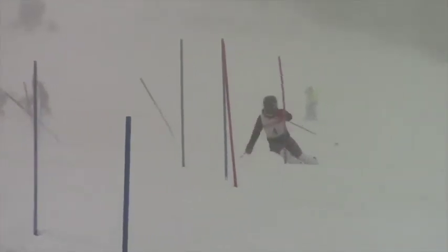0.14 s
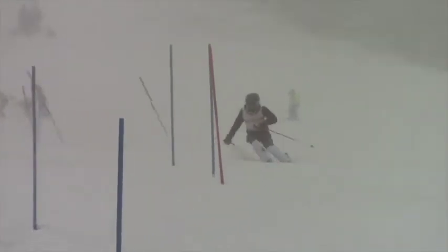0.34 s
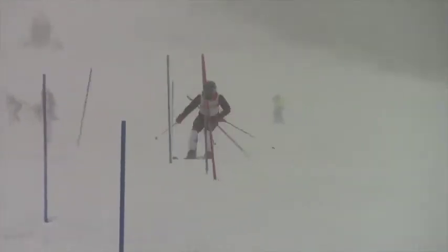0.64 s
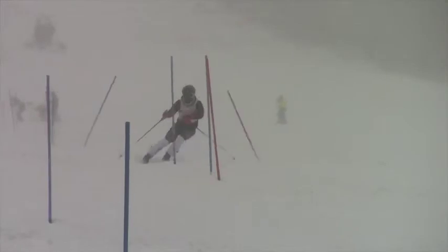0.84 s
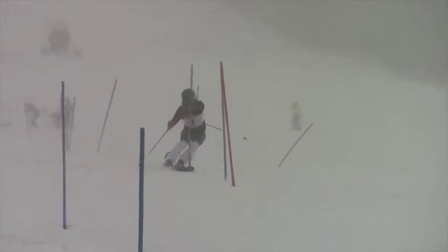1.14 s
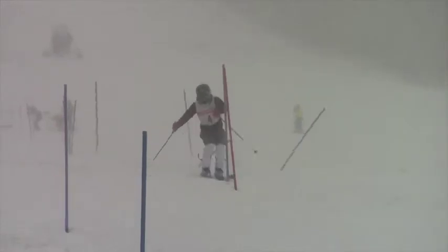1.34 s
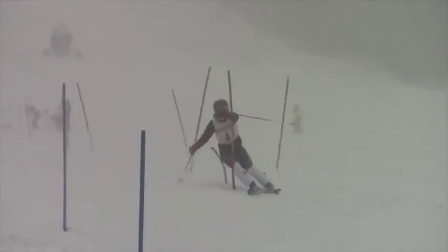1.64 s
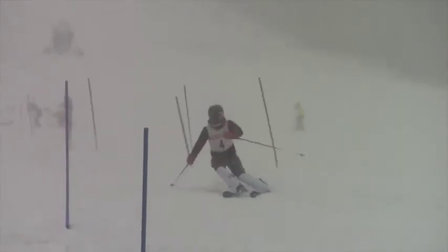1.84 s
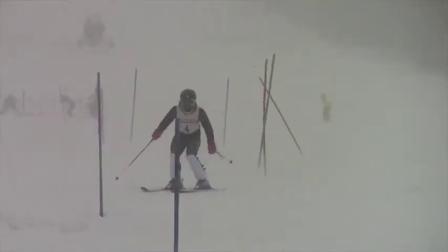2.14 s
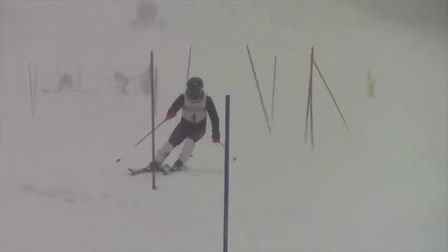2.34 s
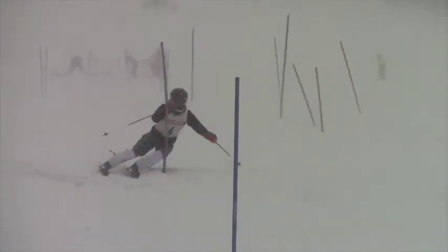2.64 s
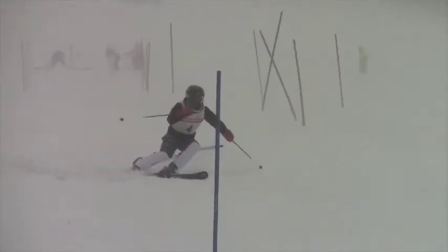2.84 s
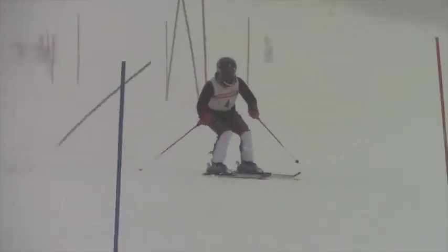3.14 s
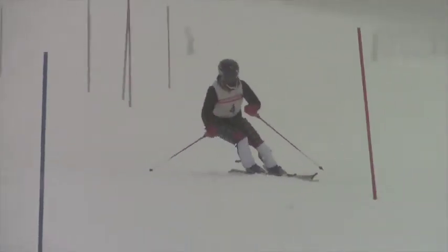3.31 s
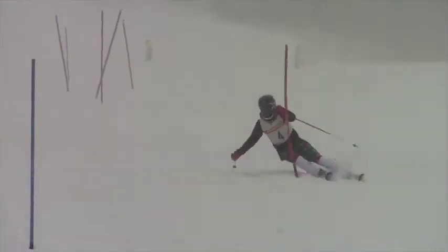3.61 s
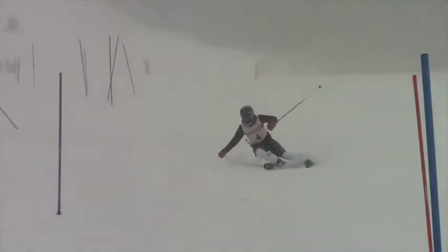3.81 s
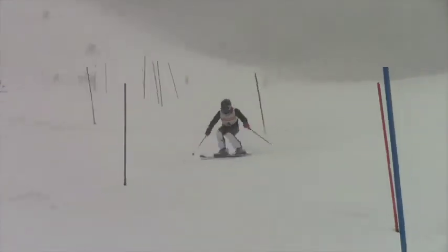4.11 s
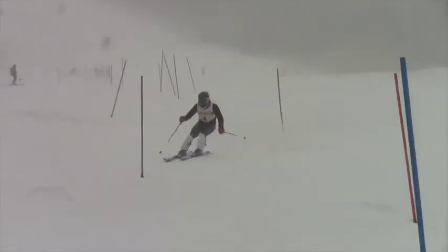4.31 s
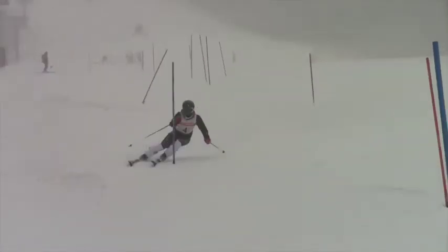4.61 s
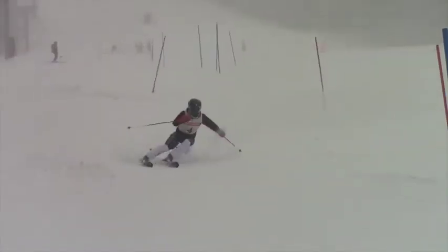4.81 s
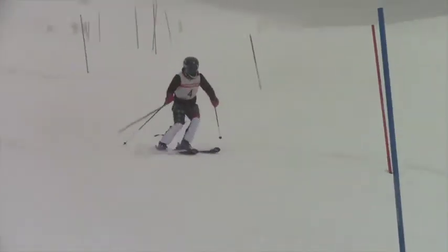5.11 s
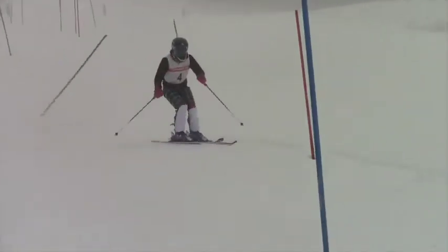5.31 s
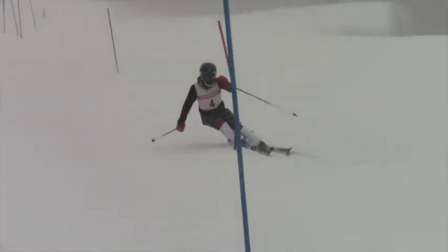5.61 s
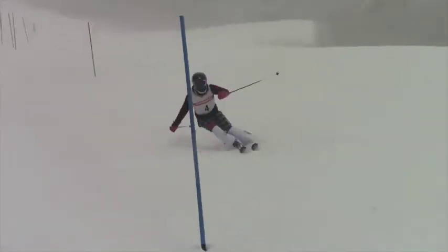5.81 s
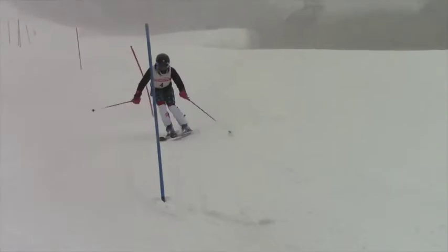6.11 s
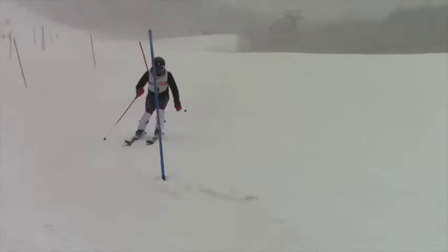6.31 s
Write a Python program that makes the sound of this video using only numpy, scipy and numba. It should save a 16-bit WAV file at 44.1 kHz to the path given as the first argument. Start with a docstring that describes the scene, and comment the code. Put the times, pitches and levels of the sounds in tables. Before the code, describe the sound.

On an open, foggy slope, a slalom racer passes gate after gate. Each turn brings a gritty edge rasp and bright snow hiss, with a hard hollow plastic knock, quick rebound and slap on the snow. Small rattles follow. A camcorder's microphone catches light wind at first, then heavy low buffeting from about four seconds.

```python
"""Wind rumbles on a camcorder, hardest late on, as a slalom racer comes down hard snow, turn by turn.
Edges rasp and hiss: filtered noise and ice grains follow how each edge sets, bites and lets go.
Gate poles knock, clack and slap: beating tube modes and bursts of chattering contact noise.
The wind is noise through a low-pass that opens with the gusts, with single eddies popping in it.
Below lie hillside hiss and two faint hum tones; a short creak of ringing ticks comes near the end."""
import sys
import numpy as np
from scipy import signal
from scipy.fft import rfft, irfft
from scipy.io import wavfile
from scipy.ndimage import uniform_filter1d
from numba import njit

SR = 44100
rng = np.random.default_rng(int(sys.argv[2]) if len(sys.argv) > 2 else 0)


def master(y):
    """Save y as 16-bit WAV."""
    cut = np.clip(np.atleast_2d(y).T, -1, 1)
    pcm = np.round(cut * 32767)  # scale
    wavfile.write(sys.argv[1], SR, pcm.astype(np.int16))


N = 284665
TIME = np.arange(N) / SR

# Breeze at the microphone. Each row: time in seconds, level in dB.
BREEZE_LEVELS = [(0.0, -42.5), (0.83, -34.5), (1.76, -42.5), (2.12, -36.5), (3.41, -42.5), (3.8, -38),
                 (4.06, -28), (4.56, -25.5), (4.76, -34), (5.12, -15), (5.32, -31), (5.8, -32),
                 (6.45, -39.5)]
# Gusts hitting the ports. Each row: centre in seconds, peak level in dB, half length in seconds.
WIND_GUSTS = [(0.122, -31.5, 0.018), (1.185, -29.5, 0.026), (3.72, -26, 0.018), (4.141, -18, 0.014),
              (4.182, -18.5, 0.019), (4.287, -19, 0.027), (4.388, -22.5, 0.026), (4.492, -19, 0.028),
              (4.625, -22.5, 0.036), (4.688, -19.5, 0.021), (4.738, -20.5, 0.019), (4.94, -20, 0.041),
              (5.002, -20, 0.0095), (5.061, -19, 0.015), (5.133, -13.5, 0.03), (5.2, -19.5, 0.04),
              (5.366, -18.5, 0.023), (5.514, -20.5, 0.042), (5.599, -16, 0.026), (5.65, -22.5, 0.032),
              (5.917, -18.5, 0.034), (6.091, -23.5, 0.012)]
CUT_HZ, THIN_HZ = 53.2, 185  # low cut of the rumble, before and after it thins
THIN_FROM_S, THIN_TO_S = 4.37, 5.07
CENTRE_S, CENTRE_DB_PER_S = 4.652, 222  # from here the wide sound sinks, leaving the centre
WIND_LEAN = 0.22  # the right port takes more of the sideways push

# Hillside hiss. Each row: frequency in Hz, level in dB.
AIR_SPECTRUM = [(150, -9), (330, 9.5), (700, -1), (1200, -1), (2000, -10), (5000, -35)]
# Faint hum. Each row: frequency in Hz, level in dB, loudest moment in seconds, half length in seconds.
HUM_TONES = [(301.4, -49, 2.51, 0.73), (411, -48.5, 2.5, 0.56)]

# Turns. Each row: edge sets, bites fully and lets go in seconds, scrape level at full bite in dB
# ahead of the mix, fade after letting go in dB per second, spray against scrape in dB.
SKI_TURNS = [(0.385, 0.424, 0.55, -42, 57, -9.5), (1.143, 1.395, 1.533, -39, 82, -8),
             (1.798, 1.797, 2.03, -36, 71, -9.5), (2.565, 2.693, 3.11, -39, 99, -11),
             (3.465, 3.757, 4.125, -34.5, 302, -10.5), (4.595, 4.588, 4.615, -36.5, 83, -10),
             (4.804, 4.816, 5.05, -37, 59, -6.5), (5.547, 5.734, 5.92, -30.5, 48, -6.5),
             (6.35, 6.393, 6.44, -39, 53, -9.5)]
GLIDE_DB, GLIDE_SPRAY_DB = -55, -62  # skis running flat between turns
SET_DB_PER_S, BITE_S = 167, 0.026  # how fast the edge comes in; how long the bite takes
SET_DB, LOAD_DB = -7.5, -7.5  # pressure as the edge sets and just before it bites, against full bite
HISS_UNDER_LOAD_DB = -3  # the narrow edge hiss gives way to the scrape once it bites
HISS_LEAD_S = 0.0334  # the edge hisses a moment before it scrapes
EDGE_HISS_HZ, EDGE_HISS_WIDTH = 7910, 0.22  # centre; width as a share of the centre
# Scraping edge. Each row: frequency in Hz, level in dB.
SCRAPE_SPECTRUM = [(380, -22.5), (650, -1), (900, -6), (1300, -1), (2960, -5), (4620, -9), (6000, -16),
                   (7800, -99)]
# Thrown snow. Each row: frequency in Hz, level in dB.
SPRAY_SPECTRUM = [(4800, -38), (5800, -5.5), (8300, -3.5), (14000, -10), (16000, -14)]
# Bands of the flexing ski. Each row: centre in Hz, width as a share of the centre, dB against scrape.
SKI_FLEX_BANDS = [(1680, 0.21, -10), (2870, 0.15, -9.5), (4030, 0.15, -11)]
# Scuffs over rough patches. Each row: centre in seconds, level at the centre in dB,
# half length in seconds, pitch in Hz.
EDGE_SCUFFS = [(.25, -51, 0.085, 930), (0.738, -48, 0.042, 1980), (1.992, -34, 0.0089, 2280),
               (4.609, -36, .032, 2690), (5.32, -38.5, .004, 3600)]

# Hand guard striking each gate pole. Each row: start in seconds, tube level in dB, strongest pitch
# in Hz, crack, bright ping and rebound levels in dB, delay of the rebound in seconds.
GATE_BLOWS = [(0.3873, -25, 1290, -26, -35, -36, 0.028), (1.3586, -14, 1860, -19, -44, -29, 0.016),
              (1.7714, -11, 1360, -20.5, -37, -27.5, 0.011), (2.821, -11, 1720, -20, -24, -27.5, 0.029),
              (3.7825, -11.5, 1420, -29, -27.5, -18.5, 0.022), (4.7842, -11, 1510, -17, -20.5, -23.5, 0.02),
              (5.7148, -9, 1210, -18.5, -15.5, -21, 0.029)]
# Wall modes of a gate pole. Each row: frequency in Hz, level in dB.
TUBE_MODES = [(850, -9.5), (1180, 4), (1270, -1), (1380, -0.5), (1560, 1.5), (1680, 1.5), (2030, 1),
              (2240, -2.5), (2460, -2), (2920, 2), (3900, 1), (4550, 4)]
TUBE_T60_S = 0.049  # nominal ring time of the lowest mode after a full blow
# Crack of the blow. Each row: frequency in Hz, level in dB.
CRACK_SPECTRUM = [(500, -6.5), (1500, -1), (2400, 7), (3400, 0.5), (4500, 7.5), (5500, -7.5), (8200, 2.5),
                  (9500, -7.5), (16000, -13.5)]
# Ping of the hard hand guard. Each row: frequency in Hz, level in dB.
PING_SPECTRUM = [(7000, -15), (8250, -0.5), (9300, -15.5)]
REBOUND_CRACK_DB = -5  # the pole meets the guard a second time; its crack against its ring
RATTLE_FROM_S, RATTLE_S = .06, .2  # the pole rattles once the shin has passed; for how long
RATTLE_DB, RATTLE_FADE_DB_PER_S = -20.5, 63  # level against the gate's knock
# Poles slapping the snow about 125 ms after the knock. Each row: start in seconds, body level in dB,
# snap level in dB, length of the rattle in seconds, low edge in Hz.
SNOW_SLAPS = [(.52, -27.5, -44, 0.0086, 493), (1.4727, -31.5, -16, 0.0027, 350),
              (1.901, -20.5, -28, 0.0085, 444), (2.947, -16.5, -27, 0.0038, 590),
              (3.904, -20, -35, 0.0042, 300), (4.9152, -21.5, -15.5, 0.003, 1200),
              (5.836, -15.5, -21, 0.0075, 300)]
TOUCH_S, TOUCH_DB = 0.0062, -11  # the bent pole grazes the snow just before it slaps down
# Hard clacks: a shin guard about 60 ms after each gate's knock, and skis, boots and sticks. Each row:
# start in seconds, body level in dB, snap level in dB, length of the rattle in seconds, low edge in Hz.
GEAR_CLACKS = [(.456, -35.5, -40, 0.0032, 500), (1.4212, -21, -19, 0.0052, 350),
               (1.483, -25.5, -25.5, 0.0093, 398), (1.8143, -23.5, -35, 0.0036, 890),
               (1.825, -13, -23, 0.0045, 920), (1.964, -28.5, -54, 0.0024, 596),
               (2.0555, -46, -37, 0.0035, 1500), (2.891, -31, -26, 0.0029, 1500),
               (2.981, -28.5, -28.5, 0.012, 503), (3.436, -28, -48, 0.0016, 400),
               (3.8452, -54, -29, 0.0012, 1200), (4.8428, -16, -20, 0.0029, 300),
               (4.8631, -20, -25, 0.0087, 800), (4.908, -15.5, -24, 0.0034, 1120),
               (4.973, -35, -22.5, 0.0024, 1200), (5.481, -33.5, -44, 0.0054, 500),
               (5.7692, -15, -16.5, 0.0049, 348), (5.806, -23, -33, .0071, 700),
               (5.8203, -16, -26, 0.002, 400), (5.9503, -14, -20, 0.0042, 400),
               (6.105, -27, -30.5, 0.0022, 1420), (6.357, -28.5, -45, 0.0012, 890)]
# Body of a clack. Each row: frequency in Hz, level in dB.
BODY_SPECTRUM = [(200, -10), (480, 1.5), (900, -2), (3000, -0.5), (3700, -7), (4500, -4), (5400, -14.5),
                 (7000, -16)]
# Snap of a clack. Each row: frequency in Hz, level in dB.
SNAP_SPECTRUM = [(3500, 4.5), (5700, -8), (8000, 4), (9500, -3), (13500, -4.5), (16000, -10)]
# Light hollow knocks of swinging poles. Each row: start in seconds, tube level in dB, strongest pitch
# in Hz, crack level in dB, nominal ring time in seconds.
POLE_TAPS = [(1.175, -30.5, 1600, -52, 0.1), (1.853, -20, 1210, -24.5, 0.077),
             (2.222, -38, 1680, -62, 0.07), (2.3192, -25, 1860, -36.5, 0.015),
             (3.164, -26, 1560, -66, 0.09), (3.378, -34.5, 1660, -39.5, 0.076),
             (4.06, -22.5, 1870, -29.5, 0.032), (5.503, -23, 1780, -60, 0.041),
             (6.195, -26.5, 1460, -43, 0.06)]
SWING_LEAD_S, SWING_DB, SWING_T60_S = 0.0064, -14, 0.11  # a soft ringing brush just before each tap

# Eddies that pop against a port. Each row: centre in seconds, level in dB, pitch in Hz.
EDDY_POPS = [(4.899, -13, 490), (5.068, -21, 620), (5.162, -13.5, 420), (5.214, -24, 960)]
# Ticks of a short creak close to the microphone. Each row: start in seconds, level in dB.
CREAK_TICKS = [(6.386, -40), (6.402, -37), (6.4114, -39), (6.431, -34)]
# Ring of each tick. Each row: frequency in Hz, level in dB, ring time in seconds.
TICK_MODES = [(1110, -3.5, .007), (4750, -1, 0.0046)]
TREBLE_DIFFERENCE_S = .000003  # size of the slight treble difference between channels, in seconds
TOP_HZ = 16000


def undb(db):
    """Decibels to gain."""
    return 10 ** (np.asarray(db) / 20)


def unit(x):
    """Scale to a spread (rms) of 1."""
    return x / (np.std(x) + 1e-12)


def curves(rows):
    """The columns of a table, joined by straight lines in time."""
    s, *columns = np.transpose(rows)
    return [np.interp(TIME, s, c) for c in columns]


def walk(rate):
    """Smooth chance with spread 1, changing about rate times a second."""
    k = max(int(SR / rate), 1)
    steps = np.repeat(rng.standard_normal(N // k + 1), k)
    return unit(uniform_filter1d(uniform_filter1d(steps, k), k)[:N])


def response(points, size=1024):
    """Causal minimum-phase impulse response of unit energy with the given spectrum."""
    hz, db = np.transpose(points)
    f = np.maximum(np.arange(size // 2 + 1) * SR / size, 1)
    # beyond the end points: 20 dB per octave, for two octaves
    octaves_outside = np.maximum(np.log2(hz[0] / f), 0) + np.maximum(np.log2(f / hz[-1]), 0)
    level_db = np.interp(np.log(f), np.log(hz), db) - 20 * np.minimum(octaves_outside, 2)
    cepstrum = irfft(np.log(undb(level_db)))
    # folding the cepstrum puts the energy as early as it can be
    cepstrum[1:size // 2] *= 2
    cepstrum[size // 2 + 1:] = 0
    h = irfft(np.exp(rfft(cepstrum)))
    return h / np.linalg.norm(h)


def colour(x, points):
    """Pass a signal through a spectrum."""
    return signal.oaconvolve(x, response(points))[:len(x)]


def low_cut(x, hz):
    """Take the bass away below hz."""
    return signal.sosfilt(signal.butter(N=3, Wn=hz, btype="high", fs=SR, output="sos"), x)


@njit
def svf(x, hz, damping):
    """Two-pole filter with a moving corner: rows low-pass and high-pass."""
    y, band, low = np.empty((2, len(x))), 0., 0.
    for i in range(len(x)):
        g = np.tan(np.pi * hz[i] / SR)
        v = (band + g * (x[i] - low)) / (1 + g * (g + damping))
        y[0, i] = low + g * v
        y[1, i] = x[i] - damping * v - y[0, i]
        band, low = 2 * v - band, 2 * y[0, i] - low
    return y


def band(x, hz, width):
    """Band-pass around a centre that may move."""
    hz = np.minimum(hz, SR / np.e) * np.ones(len(x))
    return svf(svf(x, hz, 2 * width)[0], hz, 2 * width)[1]


def add(track, s, sound):
    """Mix a short sound in at time s."""
    i = int(s * SR)
    track[i:i + len(sound)] += sound[:N - i]


def blow(sound, db):
    """Give a hit the energy of 10 ms at this level."""
    return sound * undb(db) * np.sqrt(.01 * SR / np.sum(sound ** 2))


def buffet(db, cut_hz, corner_hz=300, db_per_octave=14, burst_db=2.5, skirt_db=-34, damping=1.99,
           eddy_octaves=.25):
    """Turbulence at a port: the harder it blows, the smaller the eddies and the higher the rumble."""
    corner = corner_hz * np.clip(2 ** ((db + 21.0) / db_per_octave), .45, 3) + 1.21 * cut_hz
    corner = corner * 2 ** (eddy_octaves * walk(30))  # each eddy has its own size
    burst = undb(burst_db * walk(220))
    rumble = svf(rng.standard_normal(N) * burst, corner, damping)[0]
    # the strongest instants tear open a little above the rumble
    rumble = svf(rumble, corner * 1.25, damping)[0] + undb(skirt_db) * burst * rumble
    rumble = svf(rumble, cut_hz, 1.27)[1]
    rumble = svf(rumble, cut_hz * 0.25, 2.85)[1]
    running_rms = np.sqrt(uniform_filter1d(rumble ** 2, size=1800) + 1e-18)
    return rumble / running_rms * undb(db)


def wind(eddy_db=2.5, eddy_rate=14, side_db=7, side_corner_hz=235, side_cut_hz=62):
    """Breeze and gusts as mid and side: the stronger side pushes the two ports in opposite directions."""
    breeze_db, = curves(BREEZE_LEVELS)
    power = undb(breeze_db + eddy_db * walk(eddy_rate)) ** 2
    for s, peak_db, half_s in WIND_GUSTS:
        power = power + undb(peak_db) ** 2 * np.exp(-np.square(np.square((TIME - s) / half_s)))
    db = 10 * np.log10(power)
    cut_hz = np.interp(TIME, [THIN_FROM_S, THIN_TO_S], [CUT_HZ, THIN_HZ])
    mid = buffet(db, cut_hz)
    side = buffet(db, np.maximum(cut_hz, side_cut_hz), side_corner_hz)
    return mid, undb(side_db) * side


def slope(air_db=-50, side_db=-12, waver_share=.005):
    """Distant hiss of the hillside and two faint wavering tones that swell once, as mid and side."""
    drift_db = 2 * walk(4)
    mid, side = (unit(colour(rng.standard_normal(N), AIR_SPECTRUM)) * undb(air_db + drift_db)
                 for _ in range(2))
    for hz, db, peak_s, half_s in HUM_TONES:
        cycles = hz * np.cumsum(1 + waver_share * walk(14)) / SR
        swell = np.exp(-np.square((TIME - peak_s) / half_s)) * undb(db + 3.3 * walk(9.2))
        mid = mid + swell * np.sqrt(2) * np.sin(2 * np.pi * cycles)
    return mid, undb(side_db) * side


def edges(chatter_db):
    """Scrape, spray and hiss levels in dB as edges set, load, bite and let go; only a loaded ski chatters."""
    scrape, spray, hiss = undb(GLIDE_DB) ** 2, undb(GLIDE_SPRAY_DB) ** 2, 1e-12
    for set_s, bite_s, release_s, db, fade_db_per_s, spray_db in SKI_TURNS:
        load_s = bite_s - BITE_S
        pressure = np.interp(TIME, [set_s, max(set_s, load_s), bite_s], [SET_DB, LOAD_DB, 0])
        pressure = pressure - SET_DB_PER_S * np.maximum(set_s - TIME, 0)
        pressure = pressure - fade_db_per_s * np.maximum(TIME - release_s, 0)
        power = undb(db + chatter_db + np.maximum(pressure, -100)) ** 2
        scrape = scrape + power
        spray = spray + power * undb(spray_db) ** 2
        hiss = hiss + power * np.interp(TIME, [load_s, bite_s], [1, undb(HISS_UNDER_LOAD_DB) ** 2])
    early_hiss = np.interp(TIME + HISS_LEAD_S, TIME, hiss)
    return 10 * np.log10([scrape, spray, early_hiss])


def ski_bands(scrape_db, slide=0.065, slide_rate=6, swell_db=3.0, swell_rate=16, grain_rate=1500):
    """Breaking ice grains ring the ski in a few bands that slide and swell as it flexes."""
    out = 0
    for hz, width, db in SKI_FLEX_BANDS:
        grains = (rng.random(N) < grain_rate / SR) * rng.standard_normal(N)
        centre = hz * np.exp(slide * walk(slide_rate))
        level = undb(scrape_db + db + swell_db * walk(swell_rate))
        out = out + unit(band(grains, centre, width)) * level
    return out


def skis(chatter_db=1.48, swell_db=0.5, crumb_db=1.0, crunch_db=-4, crunch_rate=500, chip_db=-16,
         chip_rate=40, hiss_db=-9, broad_db=-1.5):
    """Edges shear ice grains, break crumbs and rarer chips; skis chatter, and thrown snow hisses above."""
    scrape_db, spray_db, edge_db = edges(chatter_db * walk(45) + crumb_db * walk(400))
    crumbs, chips = (unit((rng.random(N) < rate / SR) * rng.laplace(size=N))
                     for rate in (crunch_rate, chip_rate))
    # three separate noises share the same crumbs and chips
    grains = rng.standard_normal((3, N)) + undb(crunch_db) * crumbs + undb(chip_db) * chips
    scrape = colour(grains[0], SCRAPE_SPECTRUM)
    # a second path off the tilting ski combs the scrape, and the comb slides to and fro
    scrape = scrape + .15 * np.interp(TIME - .0009 - .00015 * walk(5), TIME, scrape)
    scrape = unit(scrape) * undb(scrape_db + swell_db * walk(13))
    spray = unit(colour(grains[1], SPRAY_SPECTRUM)) * undb(spray_db)
    hiss = unit(band(grains[2], EDGE_HISS_HZ, EDGE_HISS_WIDTH)) * undb(edge_db + hiss_db)
    return undb(broad_db) * scrape + ski_bands(scrape_db) + spray + hiss


def scuffs(width=0.31, grain_db=5.0):
    """An edge rasps briefly over a rough patch: grainy noise through a narrow band."""
    grains = rng.standard_normal(N) * undb(grain_db * walk(500))
    out = np.zeros(N)
    for s, db, half_s, hz in EDGE_SCUFFS:
        swell = np.exp(-np.square((TIME - s) / half_s))
        out += unit(band(grains, hz, width)) * undb(db) * swell
    return out


def contact(decay_s, ragged, size=4096):
    """A dying burst of uneven micro-impacts, as hard plastic chatters on what it hits."""
    t = TIME[:size]
    chatter = np.exp(ragged * unit(uniform_filter1d(rng.standard_normal(size), size=24)))
    return rng.standard_normal(size) * chatter * np.exp(-t / max(decay_s, 1e-4))


def knock(tube_db, pitch_hz, crack_db, t60_s, focus=0.39, spread_db=1, crack_s=0.0022, ring_db=-17,
          ring_s=0.011, low_hz=560, size=4096):
    """A tube rings in a crowd of beating wall modes; the high ones tend to die first, with little bass."""
    t, (hz, db) = TIME[:size], np.transpose(TUBE_MODES)
    rise = 1 - np.exp(-t / .0003)
    hz = hz * (1 + 0.021 * rng.standard_normal(len(hz)))
    # the contact favours the modes near one pitch; only a hard blow wakes the others
    near_pitch = np.exp(-.5 * (np.log2(hz / pitch_hz) / focus) ** 2)
    gain = undb(db) * (near_pitch + undb(spread_db + tube_db))
    gain = gain * np.exp(2j * np.pi * rng.random(len(hz)))
    # the hand damps each mode differently
    decay = np.log(1000) / t60_s * np.sqrt(hz / hz[0]) * 2 ** rng.uniform(-0.18, 0.1, len(hz))
    tube = (gain @ np.exp(np.outer(2j * np.pi * hz - decay, t))).imag * rise
    crack = colour(contact(crack_s, 1.0) + undb(ring_db) * contact(ring_s, 1.0), CRACK_SPECTRUM)
    return blow(low_cut(tube, low_hz), tube_db) + blow(crack, crack_db)


def clack(body_db, snap_db, rattle_s, low_hz, ragged=0.46, hollow=0.33, snap_share=0.91):
    """A hard slap with a short rattle, a broad body and a bright snap; the lighter the part, the less bass."""
    body = low_cut(colour(contact(rattle_s, ragged), BODY_SPECTRUM), low_hz)
    # the blow runs along the struck part and returns, which colours each clack differently
    body = body + hollow * np.roll(body, int(SR * rng.uniform(0.00055, 0.002153)))
    snap = colour(contact(rattle_s * snap_share, 0.8), SNAP_SPECTRUM)
    return blow(body, body_db) + blow(snap, snap_db)


def gates(touch_snap_db=-17, loose_snap_db=-4, loose_s=0.006, loose_hz=900, ping_s=0.0023, count=4):
    """Each pole knocks on the hand guard, rebounds and rattles out; bent over, it grazes and slaps the snow."""
    out = np.zeros(N)
    for s, tube_db, pitch_hz, crack_db, ping_db, rebound_db, rebound_s in GATE_BLOWS:
        ping = blow(colour(contact(ping_s, 0.45), PING_SPECTRUM), ping_db)
        add(out, s, knock(tube_db, pitch_hz, crack_db, TUBE_T60_S) + ping)
        rebound = knock(rebound_db, pitch_hz, rebound_db + REBOUND_CRACK_DB, TUBE_T60_S)
        add(out, s + rebound_s, rebound)
        # one loose rattle at a chance moment in each equal share of the time
        for late_s in RATTLE_S * (np.arange(count) + rng.random(count)) / count:
            db = tube_db + RATTLE_DB - RATTLE_FADE_DB_PER_S * late_s
            add(out, s + RATTLE_FROM_S + late_s, clack(db, db + loose_snap_db, loose_s, loose_hz))
    for s, body_db, snap_db, rattle_s, low_hz in SNOW_SLAPS:
        graze = clack(body_db + TOUCH_DB, snap_db + touch_snap_db, rattle_s, low_hz)
        add(out, s - TOUCH_S, graze)
        add(out, s, clack(body_db, snap_db, rattle_s, low_hz))
    return out


def clatter():
    """Light hollow taps of swinging poles and hard clacks of the racer's gear."""
    out = np.zeros(N)
    for s, tube_db, pitch_hz, crack_db, t60_s in POLE_TAPS:
        brush = knock(tube_db + SWING_DB, pitch_hz, crack_db + SWING_DB, SWING_T60_S)
        add(out, s - SWING_LEAD_S, brush)
        add(out, s, knock(tube_db, pitch_hz, crack_db, t60_s))
    for s, *hit in GEAR_CLACKS:
        add(out, s, clack(*hit))
    return out


def scatter(x, wet_db=-26, t60_s=0.74, size=24000):
    """Snow and the bank beside the course throw back a weak noisy tail, scooped around 4 kHz."""
    tail = rng.standard_normal(size) * undb(-60 * TIME[:size] / t60_s)
    echo = signal.oaconvolve(x, tail / np.linalg.norm(tail))[:N]
    return undb(wet_db) * colour(echo, [(400, 13), (1500, 10.5), (4000, -14), (12000, 7.5)])


def pops():
    """A small eddy crosses the port: one swing of pressure."""
    out = np.zeros(N)
    for s, db, hz in EDDY_POPS:
        cycles = hz * (TIME - s)
        out += blow(np.exp(-2 * np.square(cycles)) * np.sin(2 * np.pi * cycles), db)
    return out


def creak(size=1024):
    """Something stiff sticks and slips in a few small ticks, each a pair of dying tones."""
    out, t = np.zeros(N), TIME[:size]
    tick = sum(undb(db - 60 * t / t60_s) * np.sin(2 * np.pi * hz * t) for hz, db, t60_s in TICK_MODES)
    for s, db in CREAK_TICKS:
        add(out, s, blow(tick, db))
    return out


def treble_difference(x):
    """A slight treble difference between left and right: the signal's slope, added with opposite signs."""
    return x + np.outer([.5, -.5], np.gradient(x) * TREBLE_DIFFERENCE_S * SR)


def scene():
    """The racer is near the centre; only wind and hillside are wide, until they narrow to the centre."""
    width = undb(-CENTRE_DB_PER_S * np.maximum(TIME - CENTRE_S, 0))
    poles = gates() + clatter()
    mid, side = np.array(wind()) + np.array(slope())
    racer = treble_difference(poles + skis() + scuffs() + creak())
    wide = np.outer([1 - WIND_LEAN, -1 - WIND_LEAN], width * side)
    return racer + scatter(poles) + pops() + mid + wide


def record(dry):
    """The camcorder rounds the loudest peaks and cuts the top."""
    rounded = dry / (1 + dry ** 6) ** (1 / 6)
    return signal.sosfiltfilt(signal.ellip(8, .1, 50, TOP_HZ, fs=SR, output="sos"), rounded)


dry = scene()
out = record(dry)
master(out)
```